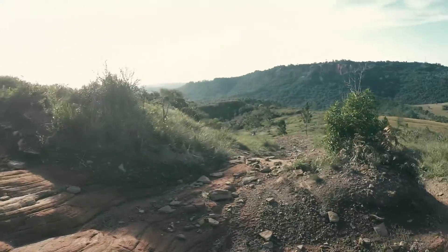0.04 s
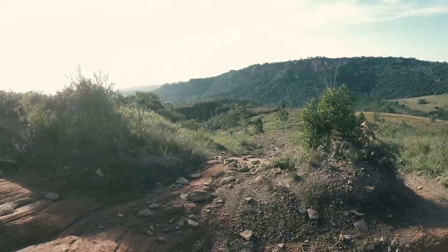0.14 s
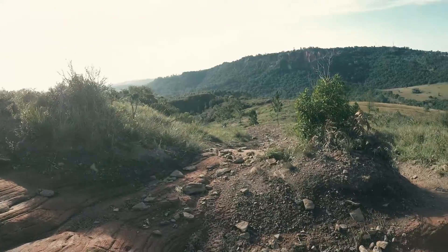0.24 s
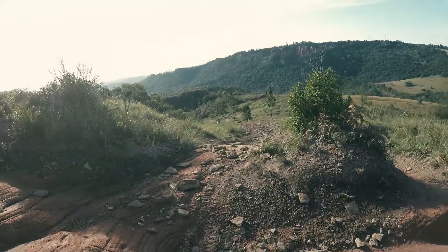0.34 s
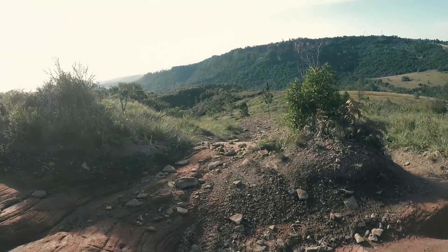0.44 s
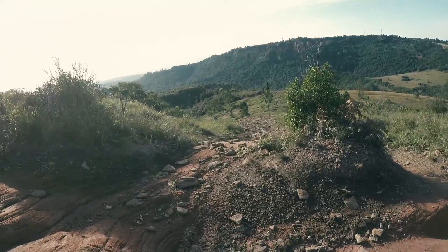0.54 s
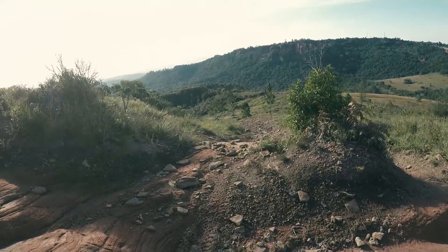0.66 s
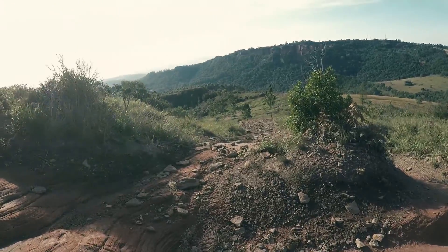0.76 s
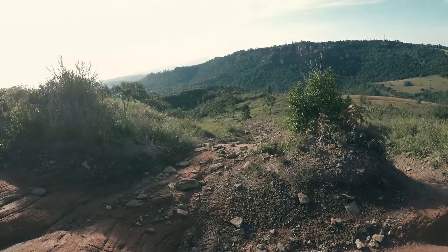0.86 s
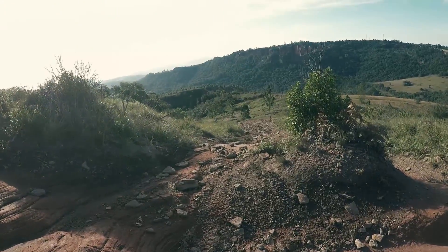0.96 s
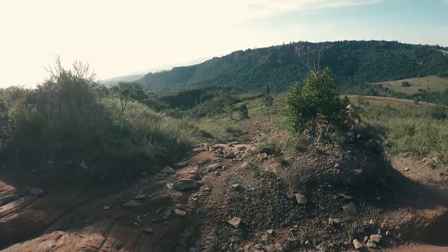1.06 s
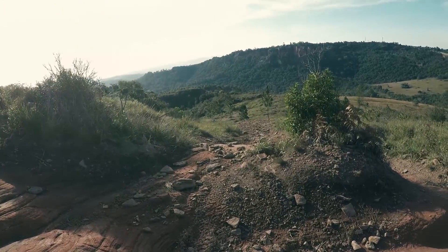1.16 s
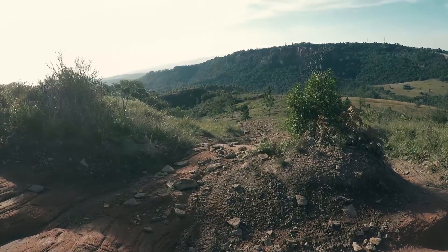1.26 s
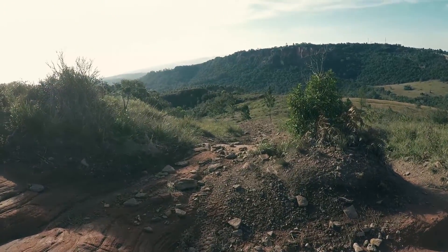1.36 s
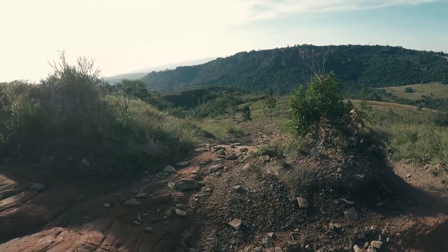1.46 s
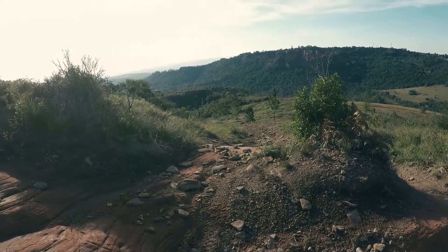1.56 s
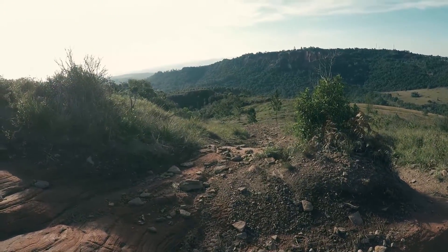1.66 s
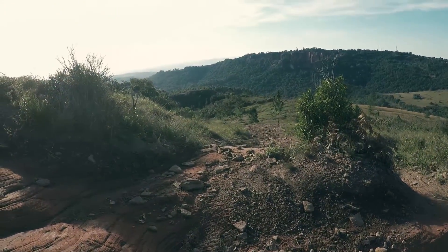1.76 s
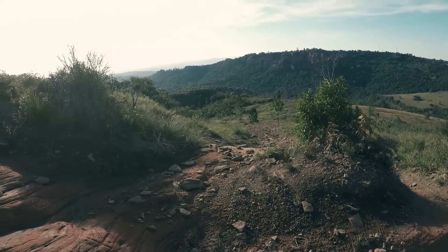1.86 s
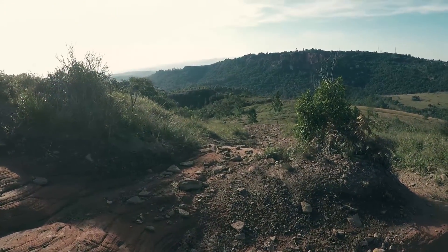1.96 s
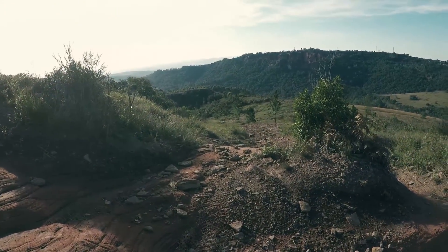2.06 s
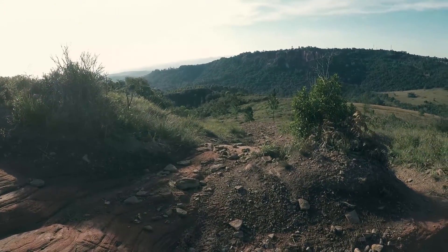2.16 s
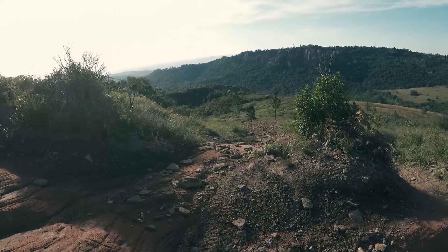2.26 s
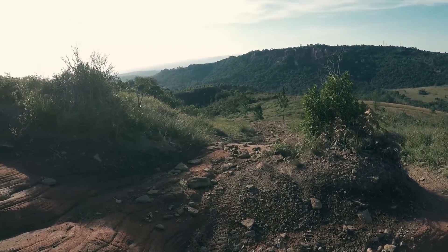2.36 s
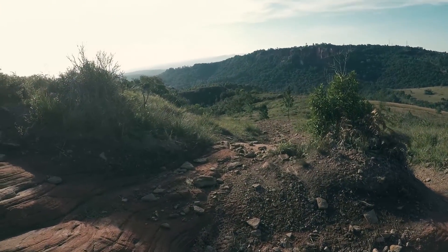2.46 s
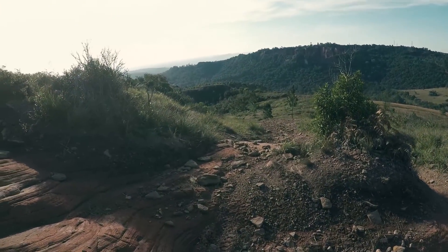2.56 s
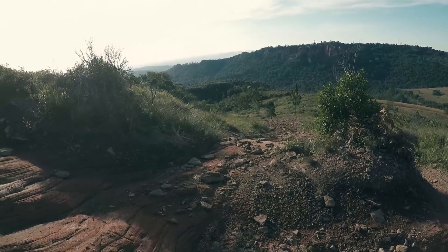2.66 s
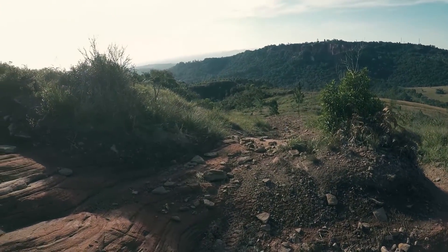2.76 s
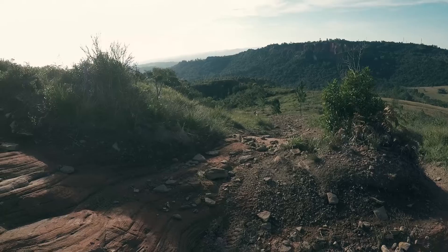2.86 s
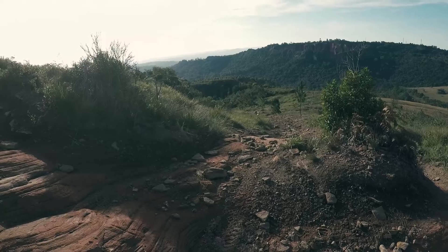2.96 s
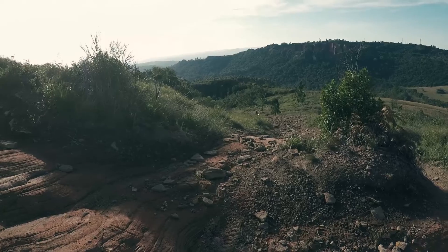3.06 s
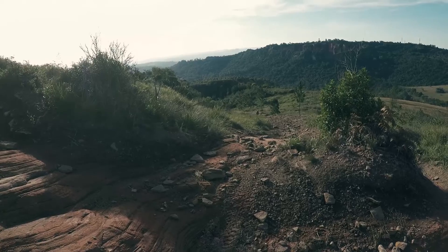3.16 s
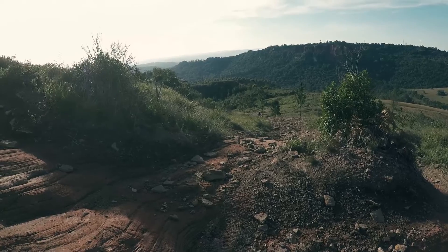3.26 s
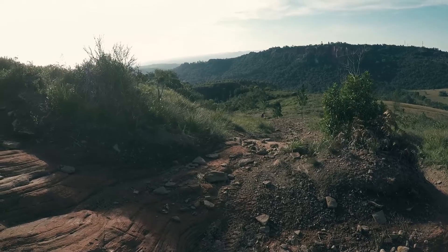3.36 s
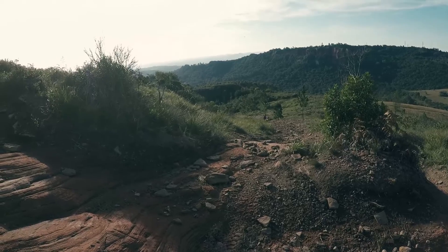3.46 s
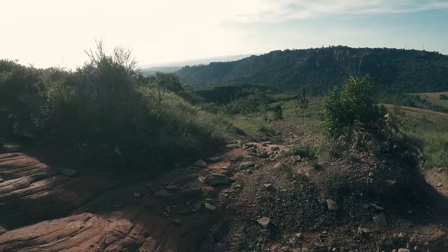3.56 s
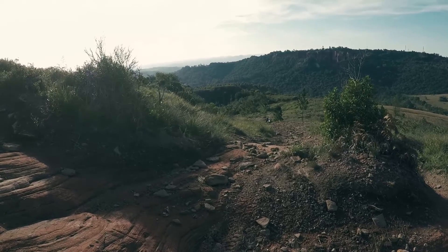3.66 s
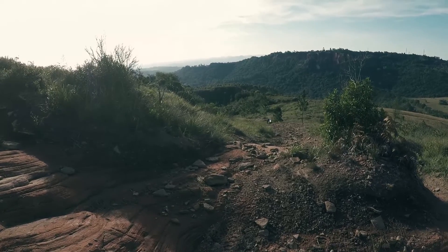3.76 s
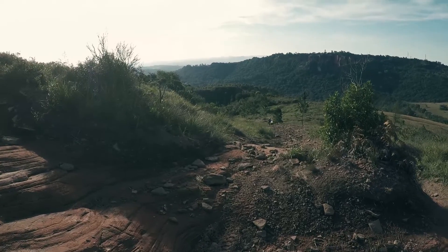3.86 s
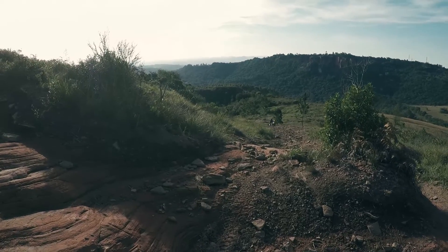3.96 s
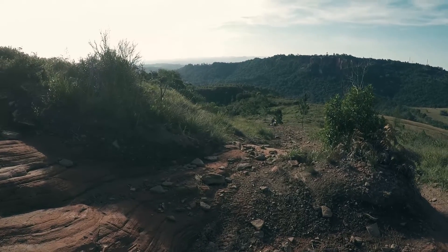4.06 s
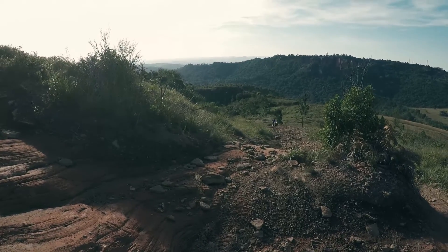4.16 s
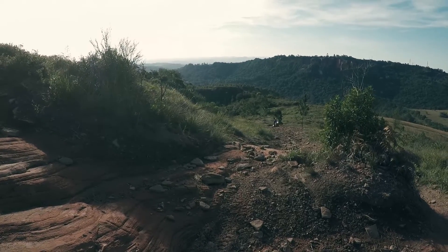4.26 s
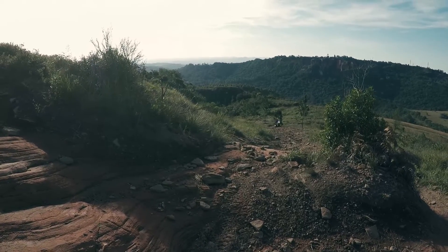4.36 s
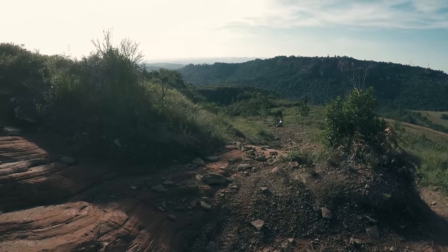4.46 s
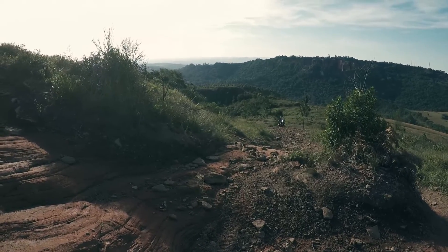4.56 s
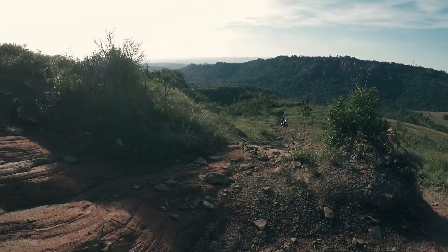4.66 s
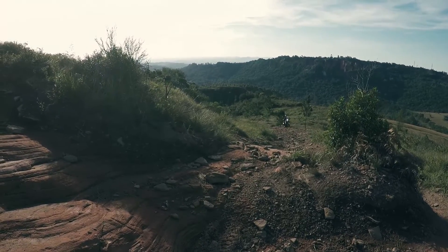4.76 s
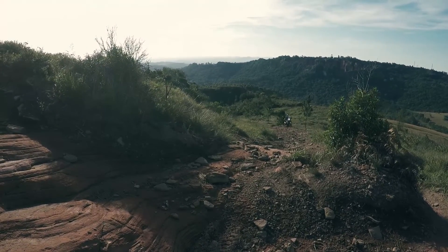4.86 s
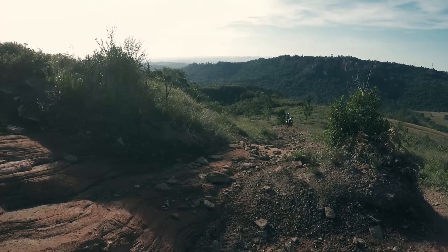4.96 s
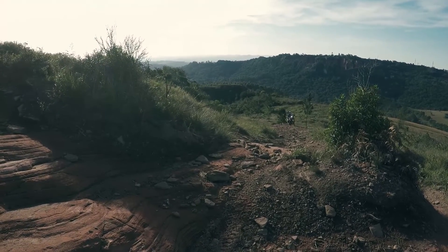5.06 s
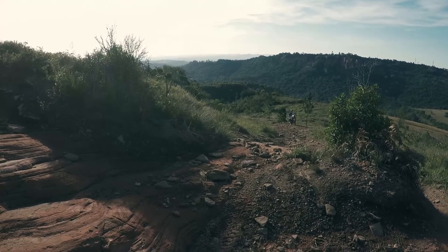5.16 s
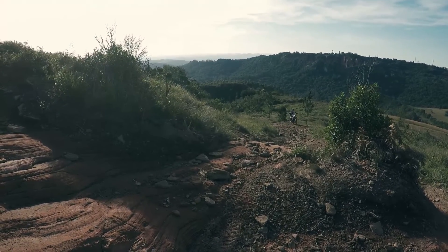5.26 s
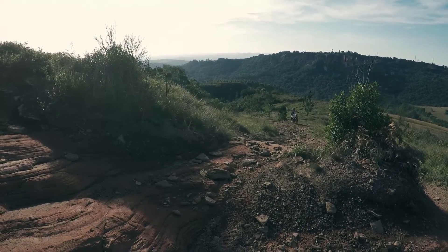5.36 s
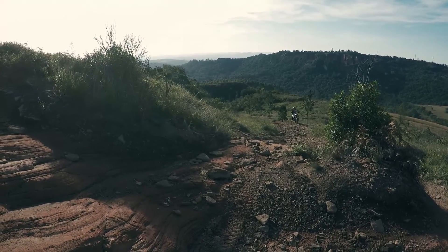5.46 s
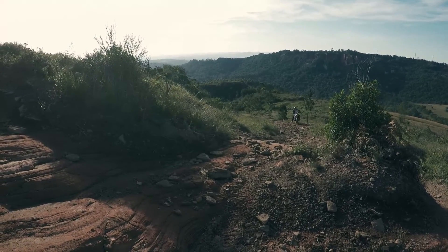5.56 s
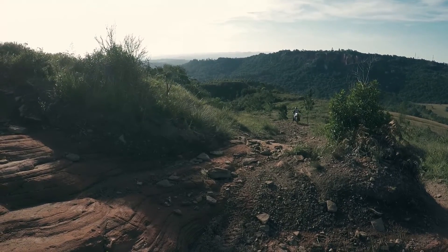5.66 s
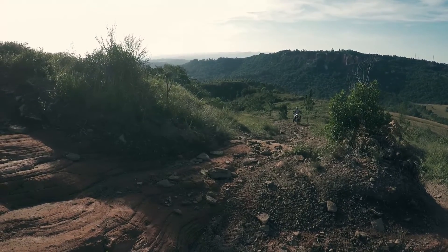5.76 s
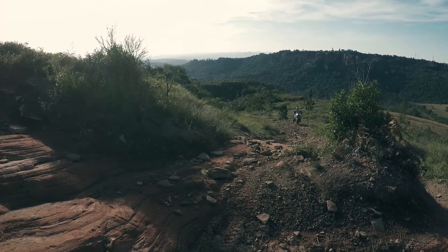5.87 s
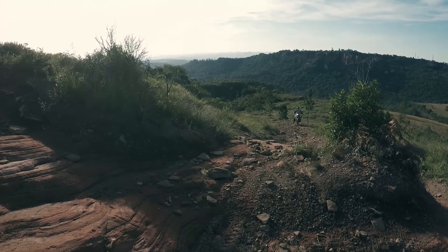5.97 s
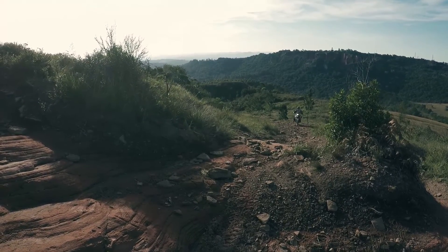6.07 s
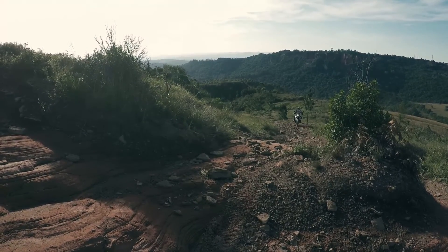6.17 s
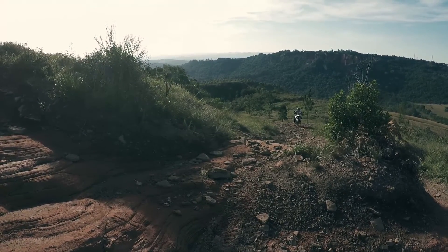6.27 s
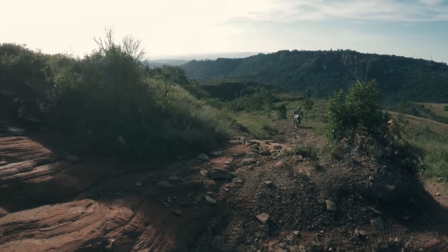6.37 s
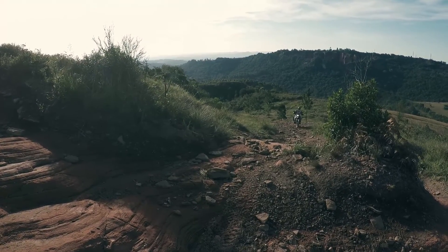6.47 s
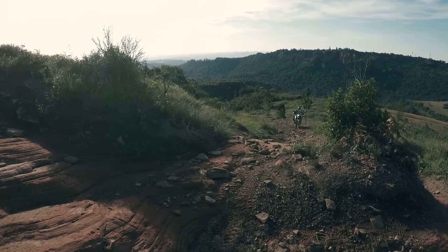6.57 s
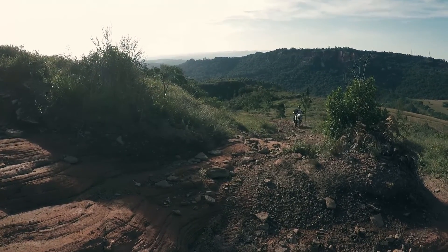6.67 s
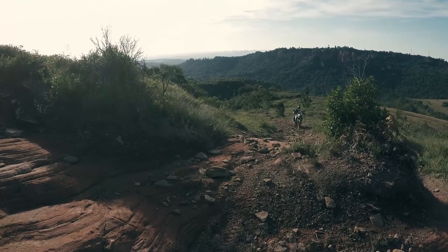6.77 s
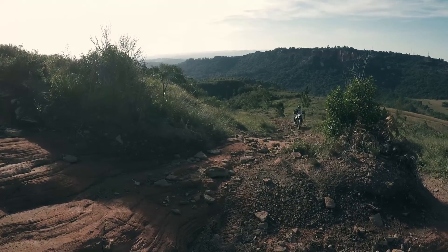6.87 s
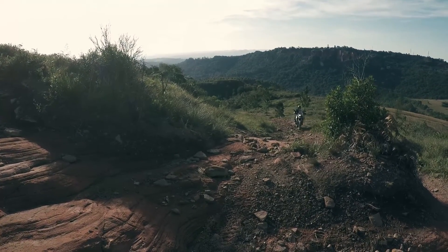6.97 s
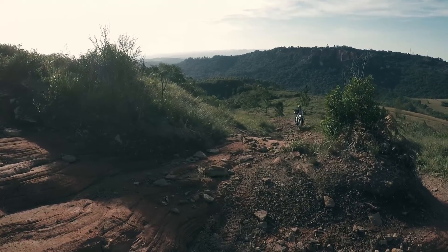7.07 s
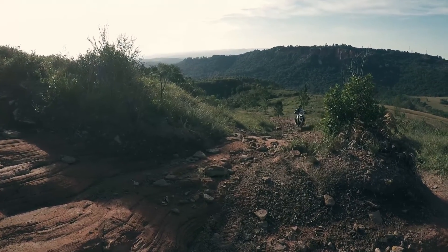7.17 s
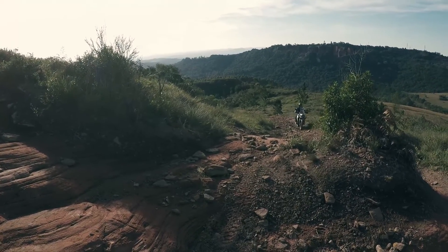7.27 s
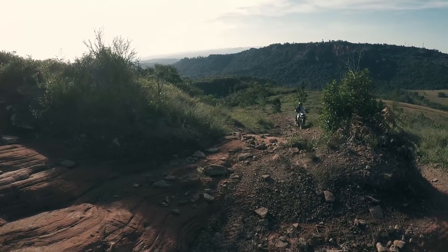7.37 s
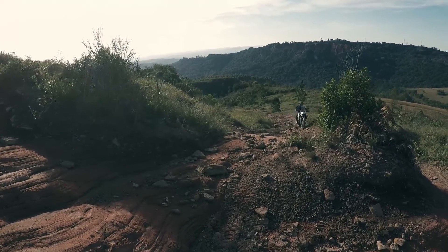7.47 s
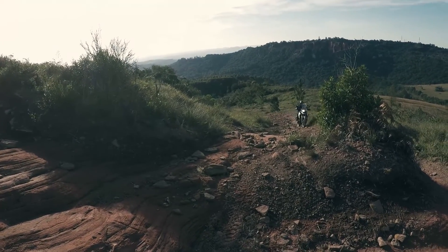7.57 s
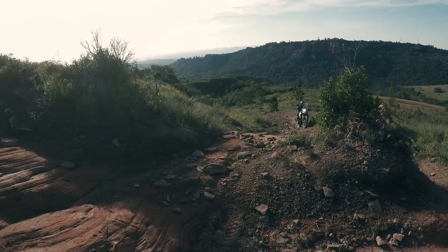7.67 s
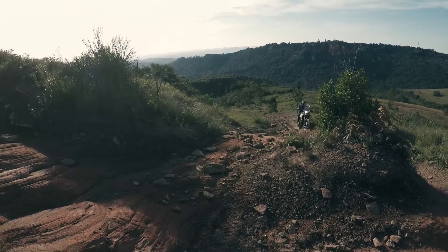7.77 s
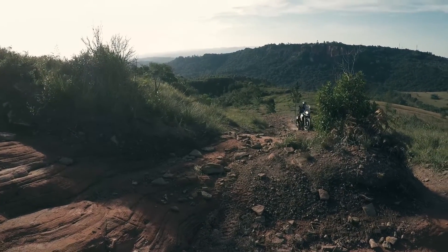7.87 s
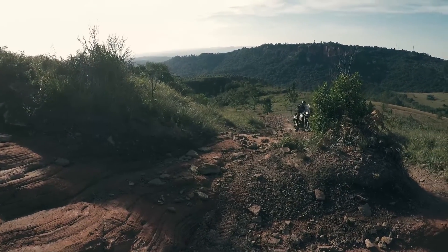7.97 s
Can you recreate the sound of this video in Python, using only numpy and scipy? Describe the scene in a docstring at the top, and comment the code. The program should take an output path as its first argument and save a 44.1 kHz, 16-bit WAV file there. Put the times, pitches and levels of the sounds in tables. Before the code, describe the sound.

Outdoors and dry, without echo, a trail bike engine putters in quick short throttle squeezes, its bassy exhaust pulses slightly uneven. Tyres drum softly, grit rustles and loose steel jingles. A few muted thumps come around two seconds, a brief rev peak near four, then rougher ground brings hard clacks, a tiny squeak near seven, and stronger gusts. The microphone rides close to the machine, mostly centred, with slightly dulled treble and wind buffeting.

```python
"""A single-cylinder trail motorcycle picks its way up a rocky track, heard from on board.
The exhaust thuds and growls as firing pulses strike the silencer, at a speed set by squeezes of the throttle.
Airbox, block, steel and tyres are shaped noise; the chain adds a thin whine.
Blows, flung stones and squeaks are short noise bursts and dying tones.
Gusts, a throbbing rumble and a steady hiss are shaped noise; the microphone case colours the treble."""
import sys
import numpy as np
from scipy import signal
from scipy.fft import rfft, irfft, next_fast_len
from scipy.io import wavfile
from scipy.ndimage import uniform_filter1d

SR = 44100
rng = np.random.default_rng(int(sys.argv[2]) if len(sys.argv) > 2 else 0)


def waveform_to_disk(signal):
    """Save audio, clipped to [-1, 1], as 16-bit WAV at the path in sys.argv[1]."""
    frames = np.transpose(np.atleast_2d(signal))
    scaled = np.clip(frames, -1, 1) * 32767
    samples = np.round(scaled).astype(np.int16)
    wavfile.write(sys.argv[1], SR, samples)


N = 353682
TIME = np.arange(N) / SR

# stones and suspension knocks: [t/s, thud level/dB, tick level/dB, t60/s], levels before each part's own trim
KNOCKS = [(0.09, -39, -56, 0.11), (0.896, -37.5, -44.5, 0.15), (2.134, -33, -61, 0.11),
          (2.189, -29.5, -66, 0.08), (2.336, -62, -51, .04), (2.64, -27, -62, 0.05),
          (5.536, -55, -42, 0.041), (5.567, -22.5, -36.5, 0.095), (5.695, -28.5, -36, 0.23),
          (5.923, -57, -43, 0.025), (6.226, -30, -39, 0.14), (6.69, -47, -36.5, 0.026),
          (6.8, -32, -35, 0.21), (6.863, -31, -27, 0.1), (6.902, -35, -36.5, 0.04),
          (7.149, -26.5, -61, 0.24), (7.285, -29, -52, 0.081), (7.361, -46, -38, 0.18),
          (7.455, -22.5, -37.5, 0.066), (7.483, -22, -41, 0.052), (7.665, -33, -33.5, 0.085),
          (7.689, -27, -38, .12), (7.902, -27, -33.5, 0.06), (7.926, -16, -38.5, 0.04),
          (7.932, -13, -37, 0.043), (7.938, -14.5, -36, 0.055), (7.953, -21, -56, 0.052),
          (7.987, -47, -36, 0.032)]


def engine(cycles, revs, exhaust_db, ground_db):
    """Exhaust, airbox, block and drive chain, all following the firing rate or the load."""
    # engine block: [f/Hz, level/dB]
    block_spectrum = [(300, -36), (600, -23), (800, 4), (1100, 3.5), (1300, 18.5), (1500, 4), (1700, 14),
                      (2100, 11.5), (2600, 14), (4000, 11), (8000, -39), (12000, -21)]
    thud = from_db(exhaust_db) * exhaust(cycles)

    # the airbox barks louder with effort, rough ground and revs
    effort_db = exhaust_db - exhaust_db.mean()
    bark_db = -50 + 0.19 * effort_db + ground_db + 8 * revs   # 8 dB per octave of revs
    bark = from_db(bark_db) * intake(cycles)

    # the block follows a share of the clatter's swing, and gains 6.5 dB per octave of revs
    block_db = -51.5 + 0.71 * ground_db + 6.5 * revs
    block = from_db(block_db) * rattle(cycles, block_spectrum, per_s=340, grain_share=0.56, side_db=-32)
    return thud * balance(.2) + bark * balance(1.3) + (block + chain(block_db)) * balance(-1.4)


def exhaust(cycles):
    """Pulses and turbulence set the silencer thudding; upper harmonics growl in uneven lumps; level evened."""
    # silencer response, with the nulls of its chambers: [f/Hz, level/dB]
    pipe = [(30, -9), (44, -3.5), (61, -10), (74, -1), (85, 2.3), (103, -2.8), (132, 0), (160, 0),
            (175, -4.5), (194, -13), (228, -7.5), (262, -16), (330, -23.5), (400, -32), (700, -51)]
    # upper exhaust harmonics that escape the silencer: [f/Hz, level/dB]
    growl_spectrum = [(240, 12), (285, -14.5), (335, 6), (400, -7.5), (465, -8), (525, -0.5), (590, -24),
                      (700, -24.5)]
    # silencer chambers that hold back part of each pulse and ring: [f/Hz, width/Hz]
    chambers = [(150, 25), (270, 60), (480, 110)]
    growl_db, growl_lumps_db = -21, 2.5   # growl against the thud, and its unevenness

    pulses = pulse_train(cycles, uneven_db=1.2, jitter_s=.00022)
    turbulence = .17 * rng.standard_normal(N)
    thud = struck(pulses + turbulence, pipe)
    growl = struck(pulses * from_db(growl_lumps_db * drift(30)), growl_spectrum)
    sound = thud + from_db(growl_db) * growl
    for hz, width in chambers:
        sound = sound - 2 * resonance(sound, hz, width)   # an all-pass: spreads the pulse in time
    running_power = uniform_filter1d(sound ** 2, size=8000)
    return sound / np.sqrt(running_power + 1e-12)


def pulse_train(cycles, uneven_db, jitter_s):
    """One pressure pulse per firing, each of its own strength and slightly off the beat; rms 1."""
    firing_at = np.flatnonzero(np.diff(np.floor(cycles)))
    late, strength = rng.standard_normal((2, len(firing_at)))
    place = firing_at + (jitter_s * SR * late).astype(int)
    pulses = np.zeros(N)
    pulses[np.clip(place, 0, N - 1)] = from_db(uneven_db * strength)
    return rms_one(pulses)


def intake(cycles):
    """The airbox barks once a cycle and fades by 7 dB until the next; the strength drifts in lumps."""
    # airbox resonance: [f/Hz, level/dB]
    bark_spectrum = [(300, 3), (400, -4), (460, 2), (550, -2), (660, -17), (1000, -45), (2000, -44)]
    lumps_db = 3.2 * drift(30)
    fade_db = 7 * (cycles % 1)
    return coloured(stereo_noise(side_db=-26) * from_db(lumps_db - fade_db), bark_spectrum)


def chain(block_db):
    """The chain whines softly along with the block, and sings on its guide while it is pulled taut."""
    # pulls on the chain: [t/s, held/s, level/dB]
    pulls = [(.6, 0.4, -58), (1.42, 0.47, -57.5), (2.55, 0.607, -55.5), (3.5, 0.38, -55)]
    slack_db = block_db - 13.5
    pull = np.hypot(from_db(slack_db), swells(pulls, rise_s=0.068, fall_s=0.031))
    flutter = from_db(2.2 * drift(25))
    return pull * flutter * whine(hz=1635, width_hz=380, core=.45)


def whine(hz, width_hz, core):
    """The running chain: a band of noise round a thin, wavering tone."""
    band, tone = (rms_one(resonance(resonance(rng.standard_normal(N), hz, width), hz, width))
                  for width in (width_hz, width_hz / 10))
    return rms_one(band + core * wavering(tone, share=.015, per_s=14))


def running_gear(cycles, revs, gear_db, tread_db, slide_db):
    """Tyres drum and rustle on grit; loose steel clatters and jingles, more so at high revs."""
    # tyres drumming on rock: [f/Hz, level/dB]
    thrum_spectrum = [(200, -3.5), (300, -2.5), (440, -3), (520, -11.5), (800, -20.5)]
    # clatter of steel and gravel: [f/Hz, level/dB]
    clatter_spectrum = [(1200, 0.5), (2300, 1), (3200, -4), (4500, -2), (6500, -2.5), (8200, -12.5),
                        (10000, -14), (12000, -29.5)]
    # grit hiss: [f/Hz, level/dB]
    grit_spectrum = [(3100, -1.5), (3800, -6.5), (4700, 1), (6600, -5.5), (8000, -20), (10500, -22),
                     (13000, -22)]

    clatter_db = gear_db + 8.5 * revs   # 8.5 dB per octave of revs
    thrum = from_db(tread_db) * coloured(stereo_noise(side_db=-25), thrum_spectrum)
    clatter = rattle(cycles, clatter_spectrum, per_s=83, grain_share=0.22, side_db=-3)
    clatter = from_db(clatter_db + 1) * clatter
    rustle_db = 1.5 * drift(22)
    grit = rattle(cycles, grit_spectrum, per_s=350, grain_share=0.3, side_db=-6.5)
    grit = from_db(slide_db + rustle_db - 4.5) * grit
    flutter_db = 2.6 * drift(18)
    steel = from_db(clatter_db + flutter_db - 4.5) * wavering(jingle(per_s=60), share=.01, per_s=9)
    return thrum * balance(1.4) + steel * balance(-1.2) + clatter + grit


def rattle(cycles, spectrum, per_s, grain_share, side_db):
    """Contacts swell slightly with each cycle; loose links and gravel add short random bursts."""
    burst_decay = np.exp(-1 / (.0015 * SR))   # 1.5 ms time constant
    bursts = signal.lfilter([1], [1, -burst_decay], grains(per_s, 3) ** 2 + 1e-18)
    cycle_power = 1 + .25 * np.cos(2 * np.pi * cycles)
    power = cycle_power * (1 + grain_share * bursts / bursts.mean())
    return coloured(stereo_noise(side_db) * np.sqrt(power), spectrum)


def jingle(per_s):
    """Taps of the chain set discs and sprockets ringing briefly; rms 1."""
    # ringing steel parts: [f/Hz, width/Hz, level/dB]
    steel_modes = [(3176, 43, 0), (3314, 21, 0.5), (3973, 110, -3), (4814, 72, -4), (6340, 36, -2.5)]
    ringing = 0
    for hz, width, db in steel_modes:
        taps = grains(per_s, 2.05) * rng.choice([-1, 1], N)
        ringing = ringing + from_db(db) * rms_one(resonance(taps, hz, width))
    low_pass = signal.butter(4, 7500, fs=SR, output="sos")
    return rms_one(signal.sosfilt(low_pass, ringing))


def knocks(thud_db, clack_db, tick_db):
    """Each blow is a short crack and a dying rattle, in the frame (thud), the guards (clack) and steel (tick)."""
    crack_height, crack_s, rattle_height = 1.3, .0023, .72
    out = 0
    # low edge/Hz, high edge/Hz, level/dB, side/dB
    parts = [(430, 588, thud_db, -11), (740, 4400, clack_db, -12), (2760, 6440, tick_db, -6.5)]
    for low_hz, high_hz, part_db, side_db in parts:
        centre_hz = np.sqrt(low_hz * high_hz)
        envelope = np.zeros(N)
        for s, low_db, high_db, t60 in KNOCKS:
            start = int(s * SR)
            age = TIME[:min(N - start, SR // 3)]
            crack = crack_height * np.exp(-(age / crack_s - 1) ** 2)
            tail = rattle_height * from_db(-60 * age / max(t60, .005)) * (age > crack_s / 2)
            envelope[start:start + len(age)] += from_db(blow_db(low_db, high_db, centre_hz)) * (crack + tail)
        band = signal.butter(3, [low_hz, high_hz], "band", fs=SR, output="sos")
        noise = signal.sosfilt(band, stereo_noise(side_db) * envelope)
        bandwidth_makeup = np.sqrt(SR / 2 / (high_hz - low_hz))
        out = out + from_db(part_db) * bandwidth_makeup * noise
    return out


def rings(spread, uneven_db):
    """Every blow rings the same clusters of close modes, each a little differently and in its own phase per port."""
    # rims, spokes and guards: [f/Hz, level/dB, t60/s]
    ring_modes = [(294, -5, 0.06), (537, -9, 0.028), (1080, -11, 0.094), (2040, -12, 0.076),
                  (3900, -10, 0.14), (6280, -4, 0.064)]
    out, age = np.zeros((2, N)), TIME[:SR // 5]
    for s, thud_db, tick_db, _ in KNOCKS:
        start = int(s * SR)
        for hz, db, t60 in ring_modes:
            detune, turn = rng.standard_normal((4, 1)), rng.random((2, 4, 1))
            modes = np.sin(2 * np.pi * (hz * (1 + spread * detune) * age + turn)).sum(axis=1)
            level_db = db + blow_db(thud_db, tick_db, hz) + uneven_db * rng.standard_normal()
            envelope = from_db(level_db - 60 * age / max(t60, .01)) * np.minimum(age / 0.0028, 1)
            sound = envelope * rms_one(modes)
            out[:, start:start + len(age)] += sound[:, :N - start]
    return out


def blow_db(thud_db, tick_db, hz):
    """A blow's strength slopes evenly, over log frequency, from its thud in the low mids to its treble tick."""
    return np.interp(np.log(hz), np.log([500, 4500]), [thud_db, tick_db])


def stones(pan_db):
    """Each flung stone rings a cluster of close modes, a little to one side."""
    # clacks, each at a pitch set by the stone's size: [t/s, f/Hz, level/dB, t60/s]
    clacks = [(0.088, 1395, -44, 0.039), (.461, 4500, -39, 0.022), (.897, 6190, -42, 0.033),
              (2.134, 830, -35, 0.014), (2.191, 1140, -37, .018), (2.336, 6100, -42, 0.035),
              (2.437, 5924, -42, .03), (2.493, 6000, -39, 0.044), (2.641, 2100, -34, 0.018),
              (2.79, 4660, -45.5, 0.095), (3.006, 5030, -40, .03), (3.573, 1902, -44, 0.04),
              (4.214, 6100, -40, 0.028), (4.304, 7440, -43.5, 0.036), (4.326, 1814, -40, 0.046),
              (5.238, 4860, -34.5, 0.032), (5.393, 3800, -37, 0.028), (5.446, 3762, -35, .03),
              (5.569, 7524, -25, 0.017), (5.7, 2235, -32.5, 0.057), (5.924, 3820, -21.5, 0.011),
              (5.941, 6770, -36, 0.019), (6.229, 4630, -54, 0.043), (6.297, 3605, -29.5, .018),
              (6.429, 4032, -36, 0.046), (6.863, 2055, -23, 0.024), (6.903, 3044, -30, 0.022),
              (7.484, 885, -33.5, 0.029), (7.688, 4044, -30, 0.041), (7.903, 1060, -24, 0.032),
              (7.904, 1425, -24.5, 0.034), (7.932, 1068, -26, 0.035), (7.938, 1750, -28, .03)]
    mode_spread, rise_s = .1, .0006
    out, age = np.zeros((2, N)), TIME[:SR // 8]
    for s, hz, db, t60 in clacks:
        start = int(s * SR)
        detune, turn = rng.uniform(-1, 1, (2, 7, 1))
        modes = np.sin(2 * np.pi * (hz * (1 + mode_spread * detune) * age + turn)).sum(axis=0)
        envelope = from_db(-60 * age / max(t60, .008)) * np.minimum(age / rise_s, 1)
        sound = from_db(db) * rms_one(modes * envelope) * np.sqrt(np.mean(envelope ** 2))
        out[:, start:start + len(age)] += sound[:N - start] * balance(pan_db * rng.standard_normal())
    return out


def squeaks():
    """Steel rubs: each squeak is an unsteady tone that starts fast and dies away."""
    # short squeaks: [t/s, held/s, level/dB, f/Hz]
    rubs = [(1.668, 0.024, -49, 1680), (3.595, 0.015, -55, 1896), (6.856, .002, -27, 3930),
            (6.877, 0.0081, -37, 3920)]
    pace = np.cumsum(1 + .008 * drift(150)) / SR   # unsteady time, shared by all squeaks
    out = 0
    for s, held_s, db, hz in rubs:
        swell = swells([(s, held_s, db)], rise_s=0.0021, fall_s=0.0071)
        out = out + swell * np.sqrt(2) * np.sin(2 * np.pi * hz * pace)
    return out


def air():
    """Gusts push the two ports mostly in opposite senses; below them a rumble throbs."""
    # gusts over the microphone, before the 3 dB lift below: [t/s, held/s, level/dB]
    gusts = [(0, .01, -53), (1.62, 0.23, -43.5), (2.61, 0.049, -43), (3.57, 0.32, -42), (5.68, 0.14, -38.5),
             (6.05, 0.23, -39.5), (7.62, 0.31, -36.5)]
    # rush of air: [f/Hz, level/dB]
    rush_spectrum = [(60, 7.5), (200, 7.5), (320, 2), (430, 5), (620, 3.5), (720, 4), (840, 4),
                     (1100, -0.5), (1600, -3.5), (2500, -12.5), (6000, -64)]
    # level of the deep rumble: [t/s, level/dB]
    rumble_level = [(0, -30), (1.6, -30.5), (2.6, -33), (4.1, -31), (5.6, -34.5), (6.1, -30.5),
                    (7.3, -32.5), (7.75, -24), (8.02, -27)]
    # ride rumble: [f/Hz, level/dB]
    rumble_spectrum = [(12, -40), (22, -2), (30, -7), (42, -9), (60, -18), (120, -19), (200, -25),
                       (400, -59)]
    breeze_db = -48   # steady air under the gusts, before the same lift
    throb_db, throb_period_s, first_throb_s = 1.5, .338, .245

    wind = np.hypot(from_db(breeze_db), swells(gusts, rise_s=0.12, fall_s=0.13))
    flutter = from_db(1.3 * drift(30))
    rush = wind * from_db(3) * coloured(stereo_noise(side_db=9) * flutter, rush_spectrum)
    throb = np.cos(2 * np.pi * (TIME - first_throb_s) / throb_period_s)
    rumble_db, = in_time(rumble_level)
    rumble = from_db(rumble_db + throb_db * throb) * coloured(stereo_noise(side_db=-8.5), rumble_spectrum)
    return rush + rumble * balance(-.6)


def hiss():
    """A steady floor of wide, coloured noise."""
    # steady hiss: [f/Hz, level/dB]
    hiss_spectrum = [(300, 10), (2500, -34), (7000, 3.5), (10000, 6), (11500, -2.5), (15000, -10)]
    return from_db(-60.5) * coloured(stereo_noise(side_db=3), hiss_spectrum) * balance(-2.5)


def from_db(db):
    """Amplitude gain of a level in dB."""
    return 10 ** (np.asarray(db) / 20)


def balance(db):
    """Gains that raise the first port by db and lower the second as much."""
    return from_db(db * np.array([[1], [-1]]))


def rms_one(x):
    """Scales x to rms 1."""
    return x / np.sqrt(np.mean(x ** 2) + 1e-20)


def in_time(rows):
    """Each column of a curve at every sample."""
    s, *columns = np.transpose(rows)
    return [np.interp(TIME, s, column) for column in columns]


def drift(rate):
    """Random curve of rms 1, with straight lines between rate knots per second."""
    knots = rng.standard_normal(2000)
    return rms_one(np.interp(TIME * rate, np.arange(len(knots)), knots))


def wavering(x, share, per_s):
    """Bends the pitch of x up and down by chance."""
    read_at = np.cumsum(1 + share * drift(per_s))
    return np.interp(read_at, np.arange(N), x)


def swells(rows, rise_s, fall_s):
    """Gain of events (time, hold, dB): each builds up to its time, holds and dies away."""
    power = 0
    for s, held_s, db in rows:
        before = np.maximum(s - TIME, 0) / rise_s
        after = np.maximum(TIME - s - held_s, 0) / fall_s
        power = power + (from_db(db) * np.exp(-before - after)) ** 2
    return np.sqrt(power)


def grains(per_s, spread_db):
    """Random clicks of uneven size."""
    born = rng.random(N) < per_s / SR
    return born * from_db(spread_db * np.minimum(rng.exponential(1, N), 4))


def stereo_noise(side_db):
    """White noise at two ports; side_db is their difference against their sum."""
    mid, side = rng.standard_normal((2, N))
    return mid + from_db(side_db) * side * np.array([[1], [-1]])


def resonance(x, hz, width):
    """A two-pole band-pass with gain 1 on top."""
    r = np.exp(-np.pi * width / SR)
    numerator = np.array([1, 0, -1]) * (1 - r * r) / 2
    denominator = [1, -2 * r * np.cos(2 * np.pi * hz / SR), r * r]
    return signal.lfilter(numerator, denominator, x + 1e-18)


def spectrum_gain(spectrum, size):
    """Gain of a (Hz, dB) spectrum at each FFT bin, falling away beyond its ends."""
    hz, db = np.transpose(spectrum)
    bins = np.maximum(np.arange(size // 2 + 1) * SR / size, 1)
    gain = from_db(np.interp(np.log(bins), np.log(hz), db))
    return gain / np.hypot(1, (bins / hz[-1]) ** 2) / np.hypot(1, (hz[0] / bins) ** 2)


def coloured(x, spectrum):
    """Shapes x by a (Hz, dB) spectrum; rms 1."""
    size = next_fast_len(N)
    return rms_one(irfft(rfft(x, size) * spectrum_gain(spectrum, size), size)[..., :N])


def struck(x, spectrum):
    """Shapes x by a spectrum with minimum phase, so each pulse starts at once and rings after; rms 1."""
    size = next_fast_len(N)
    cepstrum = irfft(np.log(spectrum_gain(spectrum, size)), size)
    cepstrum[0] = 0   # drops the overall gain
    response = np.exp(2 * rfft(cepstrum[:size // 2], size))   # the causal half, doubled
    return rms_one(irfft(rfft(x, size) * response, size)[:N])


def scene():
    """Engine, running gear, tyres, blows, stones, squeaks, moving air and hiss."""
    # engine speed as the rider works the throttle: [t/s, firings per second/Hz]
    firing_curve = [(0.0, 43), (0.15, 46), (0.42, 42.4), (0.7, 44.5), (0.92, 49.7), (1.14, 40.5),
                    (1.29, 43.8), (1.67, 39), (1.79, 34.5), (1.94, 41.5), (2.12, 38.5), (2.21, 42.4),
                    (2.35, 49.5), (2.52, 58.4), (2.63, 45), (2.77, 38.2), (2.92, 45), (3.04, 56),
                    (3.15, 41.5), (3.3, 36.6), (3.51, 53.5), (3.73, 40), (3.84, 53), (3.94, 40.3),
                    (4.11, 44), (4.22, 56.5), (4.3, 64), (4.4, 45), (4.49, 41.7), (4.56, 44.5), (4.72, 41),
                    (4.87, 44), (5.14, 33.5), (5.34, 41.4), (5.47, 33.3), (5.72, 58), (6.03, 31.2),
                    (6.14, 49.8), (6.3, 43.4), (6.39, 38.5), (6.52, 48.4), (6.66, 39), (6.77, 47.8),
                    (6.98, 39.8), (7.15, 45.3), (7.29, 38.1), (7.39, 41.5), (7.64, 55.7), (7.8, 39),
                    (7.91, 52.4), (8.02, 42.7)]
    # the engine works harder up the slope, in surges: [t/s, exhaust level/dB]
    effort = [(0, -33.5), (.35, -36), (.55, -34.5), (.9, -32), (1.03, -37), (1.2, -34.5), (1.85, -34),
              (2.08, -36.5), (2.35, -33), (3.2, -33), (4.05, -28.5), (4.2, -29.5), (4.3, -32), (4.47, -29),
              (4.7, -31), (5.15, -31), (5.6, -26.5), (5.83, -27), (5.96, -28.5), (6.15, -25), (6.34, -27.5),
              (6.48, -24), (6.7, -25.3), (7.3, -24), (7.6, -21), (7.76, -22), (7.92, -20), (8.02, -22)]
    # the running gear shakes more as the ground gets rougher: [t/s, clatter level/dB]
    machine = [(0.0, -61), (.35, -61), (0.79, -55.5), (1.16, -60), (2.22, -56.5), (2.43, -57), (4.06, -57),
               (4.37, -50), (5.29, -45), (5.57, -44.5), (7.27, -43.5), (7.88, -39)]
    # the tyres drum harder on bare rock: [t/s, level/dB]
    tread = [(0, -44), (0.251, -55), (0.451, -51), (.65, -43.5), (1.05, -48.5), (1.22, -57), (1.45, -45),
             (2.2, -48.5), (2.35, -50), (2.6, -45), (3.05, -44), (3.25, -57), (3.45, -46.5), (3.9, -44.5),
             (4.6, -46.5), (5.15, -56), (5.7, -46.5), (7.3, -50), (7.65, -57)]
    # loose grit slides under the tyre, before its trim: [t/s, level/dB]
    slide = [(0, -54), (0.111, -44.5), (.2, -49), (.33, -45.5), (.9, -47.5), (1.2, -53), (1.7, -51.5),
             (2.3, -53), (2.35, -46), (2.41, -47), (2.5, -42.5), (2.7, -46), (2.92, -47), (3.04, -42.5),
             (3.22, -51), (4.15, -51), (4.3, -46), (4.55, -53), (7.3, -51), (7.65, -35), (8.02, -38)]
    curves = (firing_curve, effort, machine, tread, slide)
    (firings,), (exhaust_db,), (gear_db,), (tread_db,), (slide_db,) = map(in_time, curves)

    # the throttle hand is jolted by the ground, so the speed wavers
    cycles = np.cumsum(firings * (1 + .013 * drift(18))) / SR
    revs = np.log2(firings / 43)   # octaves above a cruising speed of 43 firings per second
    ground_db = gear_db - gear_db.mean()   # how much rougher than usual the track is
    bike = engine(cycles, revs, exhaust_db, ground_db)
    bike = bike + running_gear(cycles, revs, gear_db, tread_db, slide_db)
    blows = knocks(thud_db=-9.5, clack_db=-4.5, tick_db=1.5) + rings(spread=0.056, uneven_db=4)
    return bike + blows + stones(pan_db=0.5) + squeaks() + air() + hiss()


def record(dry):
    """The microphone case adds peaks and dips, one after another; the top is cut steeply."""
    # microphone case: [f/Hz, width/Hz, level/dB]
    case = [(2536, 720, -7), (3050, 400, 4), (3620, 250, -2), (4440, 260, -1.5), (5280, 520, -12),
            (5800, 120, 3), (6850, 400, -3), (7350, 400, 3.5), (8300, 900, -2)]
    for hz, width, db in case:
        dry = dry + (from_db(db) - 1) * resonance(dry, hz, width)
    top_cut = signal.cheby2(12, 70, 15500, fs=SR, output="sos")   # 70 dB down from 15.5 kHz
    return signal.sosfilt(top_cut, dry)


dry = scene()
out = record(dry)
waveform_to_disk(out)
```